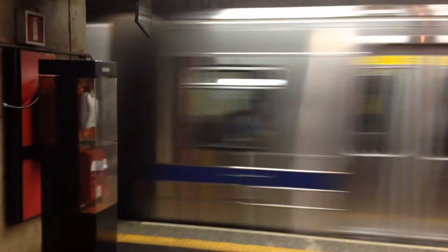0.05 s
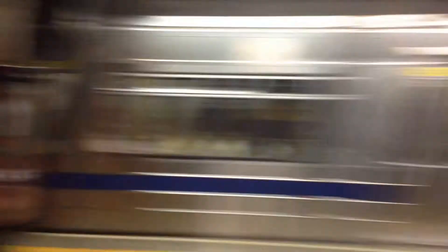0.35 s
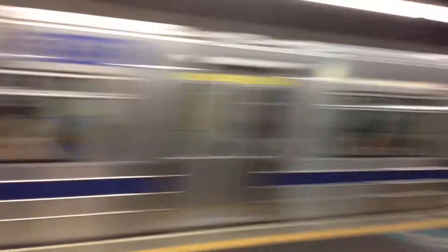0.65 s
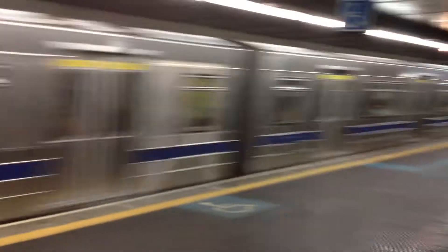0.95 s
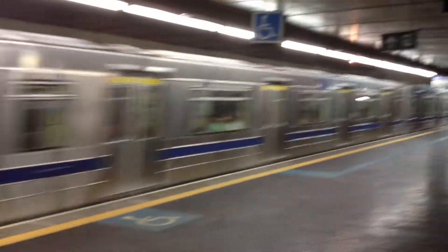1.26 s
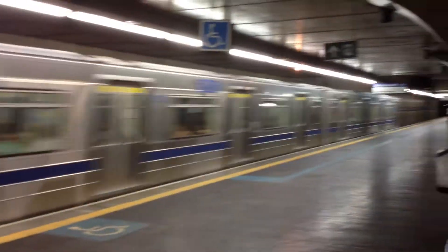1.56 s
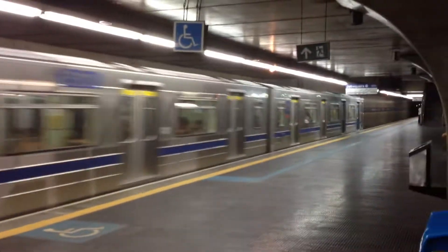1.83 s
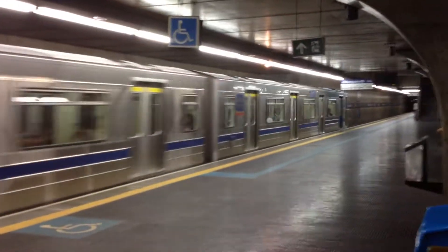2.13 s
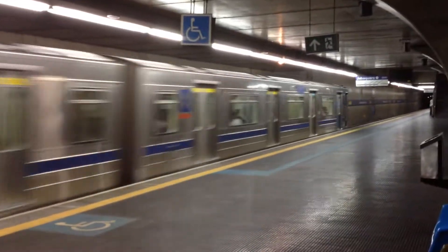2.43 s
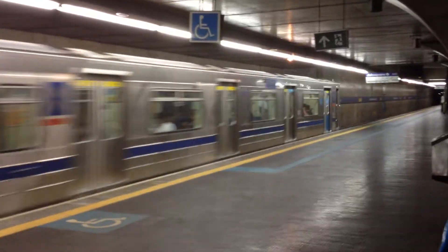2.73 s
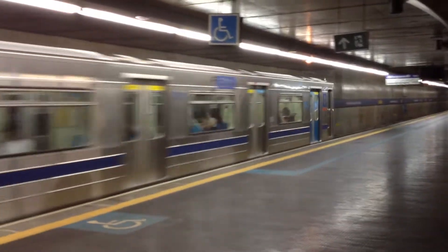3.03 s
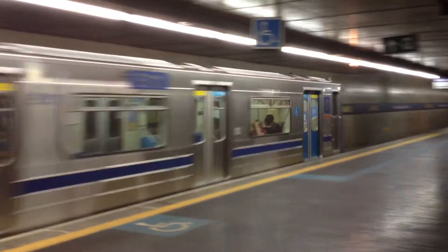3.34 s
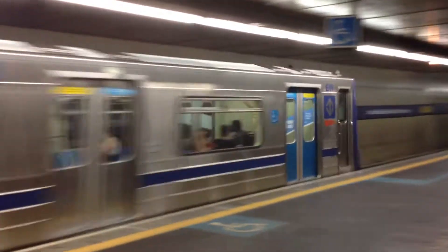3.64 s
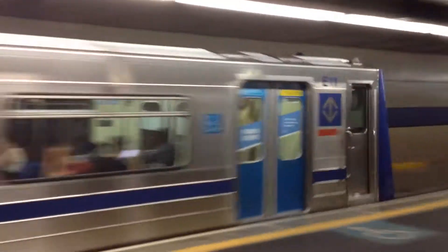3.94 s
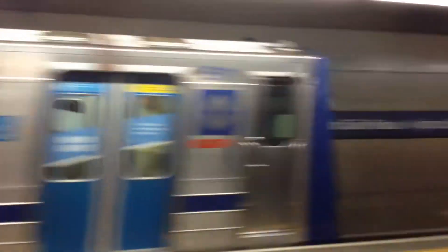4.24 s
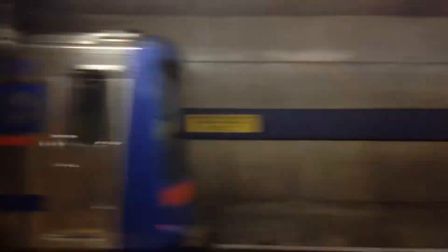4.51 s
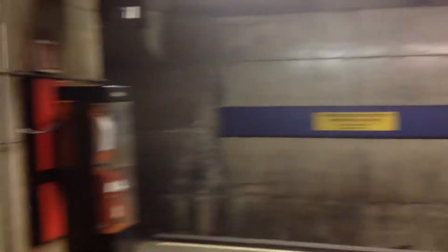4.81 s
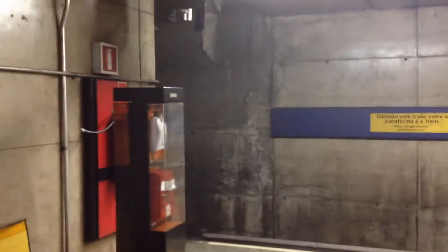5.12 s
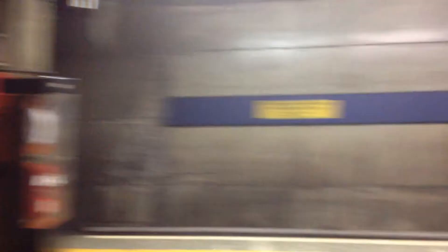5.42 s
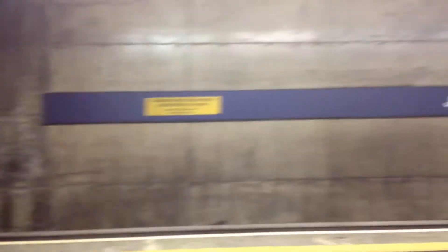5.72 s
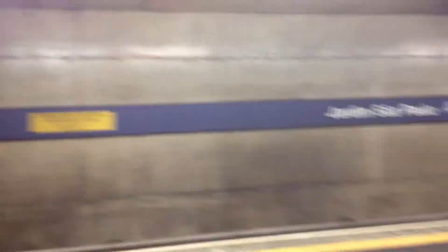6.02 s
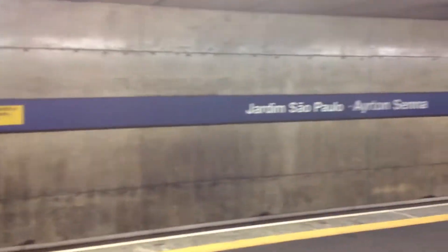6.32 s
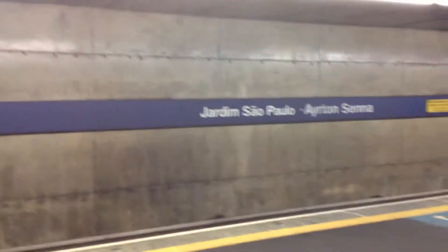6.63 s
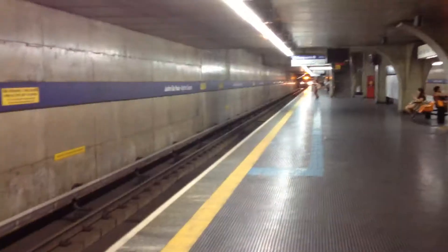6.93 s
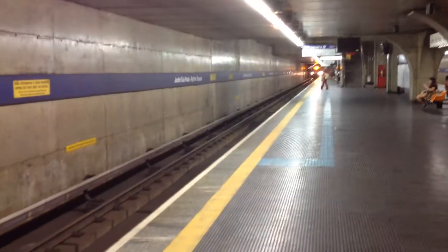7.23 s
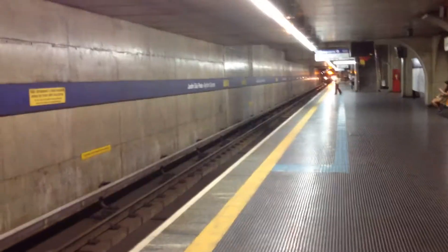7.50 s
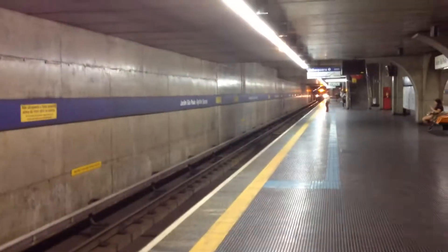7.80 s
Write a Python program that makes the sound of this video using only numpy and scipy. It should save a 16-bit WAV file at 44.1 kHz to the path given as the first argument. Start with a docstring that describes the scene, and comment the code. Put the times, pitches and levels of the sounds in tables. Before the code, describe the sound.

A metro train accelerates past with roaring wheels and whining motors, cuts to silence, then an empty station hums with three faint air puffs.

```python
"""A concrete underground station: a metro train accelerates past the platform. Car bodies rumble,
wheels roar on the rails, gears drone, motors whine and passing bogies bring swells of steel hiss.
Two wheels sing thinly, and an air leak dies away at the start. The train cuts to a short silence;
then the empty station hums, and a train at its far end lets off three puffs of air that ring on
down the hall, the last with a faint tick."""
import sys
import numpy as np
from scipy import signal
from scipy.fft import rfft, irfft, next_fast_len
from scipy.io import wavfile

SR = 44100
rng = np.random.default_rng(int(sys.argv[2]) if len(sys.argv) > 2 else 0)


def transcribe(u):
    """Save the signal u as a 16-bit wav file named by the first command-line argument.

    u: samples, shape (n,) or (channels, n), limited to [-1, 1]; the rate is SR.
    q: integer samples, one column per channel.
    """
    v = np.clip(np.atleast_2d(u).T, -1, 1)
    q = np.round(v * 32767).astype(np.int16)
    wavfile.write(sys.argv[1], SR, q)


N = 351036
TIME = np.arange(N) / SR
BIN_HZ = np.maximum(np.fft.rfftfreq(next_fast_len(N), 1 / SR), 1)
TRAIN_CUT_S, PLATFORM_IN_S = 6.435, 7.046

# Colours of the train's noises. Each row: frequency in Hz, relative level in dB.
RUMBLE_COLOUR = [(25, -38.5), (45, -43), (70, -15.5), (97, -18), (114, -2), (130, -3.5), (160, 0), (185, 0),
                 (230, 0.5), (330, -20.5)]
ROAR_COLOUR = [(140, -35), (190, -16), (235, -1), (290, 3.5), (380, -1), (530, -1.5), (680, -1),
               (950, -2.5), (1100, -4.5), (1350, -10), (1800, -22.5), (3000, -46.5)]
RASP_COLOUR = [(900, -31), (1300, 1.5), (1500, 2.5), (1750, 0.5), (2100, 1.5), (2550, 0), (3000, -5),
               (3900, -10), (4450, -8), (4900, -13.5), (5400, -23.5), (6500, -43.5)]
STEEL_COLOUR = [(2400, -9.5), (3300, 5), (4400, 6), (5050, -3), (5450, -5.5), (6200, 1.5), (7100, -1),
                (8200, 1.5), (9200, -3.5), (10500, -11), (12400, -11.5), (14000, -20), (15700, -26)]
FLANGE_COLOUR = [(8000, -10.5), (10500, -3.5), (11600, 1.5), (12800, -3), (14000, -9.5), (15700, -15.5)]
LEAK_COLOUR = [(4000, -8), (6200, 1.5), (9000, -10), (12500, -12.5), (15700, -8)]
# Wheel and rail resonances. Each row: centre in Hz, width in Hz, boost in dB.
ROAR_MODES = [(438, 96, 3.5), (795, 150, 3), (894, 140, 4.5)]
RASP_MODES = [(2000, 280, 2.7), (3455, 160, 2.5), (4400, 300, 1.1)]
# Fades of the train's layers. Each holds: opening level in dB, sag in dB per second,
# start of the fade into the distance in seconds, loss in dB per doubling of distance.
RUMBLE_FADE = (-26.5, .35, 2, 1.23)
ROAR_FADE = (-15.5, 0.0558, 5.5, 2.26)
RASP_FADE = (-26, 0.3052, 5, 1.5)
HISS_FADE = (-36, 0.8, 4.85, 4)
GEAR_FADE = (-24, 0.95, 6.5, 9)
# Bogies at the car ends go by. Each row: peak time in seconds, half length in seconds,
# lift of the roar in dB, lift of rasp and hiss in dB.
CAR_ENDS = [(0, 0.051, 0.5, 0.7), (.87, .15, 1.8, 1), (2.466, 0.12, 3, 2.9), (3.2, .22, -0.2, 1.0),
            (3.7, 0.14, 2.5, 0.8), (4.75, 0.11, -0.5, 0.8), (5.35, 0.1, 0.5, 0), (5.75, 0.28, 0.8, 1.7)]
# Hums and resonances of passing parts. Each row: peak time in seconds, half length in seconds,
# pitch in Hz, width in Hz, level in dB.
RING_SWELLS = [(1.8, 0.68, 114, 2.5, -37.5), (1.35, .2, 165, 14, -27.5), (2.42, .17, 210, 20, -34.5),
               (2.61, .2, 930, 32, -28), (3.3, 0.23, 222, 4, -32), (3.5, 0.4, 890, 78, -21.5),
               (4.62, 0.083, 310, 30, -26), (6, 0.13, 850, 58, -27), (4.73, 0.98, 1230, 240, -29),
               (1.4, 1, 3900, 800, -37.5), (3.4, 0.32, 4000, 650, -39), (6.05, .35, 560, 170, -25.5)]
# Flanges brush the rail. Each row: peak time in seconds, half length in seconds, level in dB.
FLANGE_SWELLS = [(.05, 0.1, -59.5), (.65, 0.24, -61.5), (2.35, .25, -51.5), (3.6, .15, -59),
                 (4.2, .12, -56), (4.7, 0.13, -53)]
# Gearboxes pass; the closer, the purer the tone.
# Each row: peak time in seconds, half length in seconds, width in Hz, level in dB.
GEARBOXES = [(.58, 0.11, 8.5, -22.5), (.92, 0.14, 7.5, -22.5), (2.0, .16, 30, -22.5), (2.6, 0.088, 20, -23),
             (3.05, .14, 12, -21.5), (3.74, 0.11, 16, -23.5), (5.4, 0.33, 17, -23.5)]
# Motor whine, lost in the roar once its car is past. Each row: time in seconds, pitch in Hz, level in dB.
MOTOR_CURVE = [(0, 1928, -34), (.62, 2026, -31), (1.35, 2063, -33), (1.7, 2070, -50), (2.6, 2062, -67)]
# Two singing wheels, one curve each. Each row: time in seconds, pitch in Hz, level in dB.
WHEEL_CURVES = [
    [(0, 10150, -58), (.9, 10750, -61.5), (1.6, 10650, -74)],
    [(.8, 12100, -71), (2, 12600, -58.5), (2.5, 12480, -62.5), (3.8, 12300, -68.5)],
]
# The air leak dies away. Each row: time in seconds, level of the whistle in dB.
LEAK_CURVE = [(0, -35), (.3, -39.5), (.5, -46.5), (1.2, -57.5), (1.6, -82.5)]

# Colours of the room tone, the puffs and their tail. Each row: frequency in Hz, relative level in dB.
ROOM_COLOUR = [(30, -37), (90, -16), (125, -4.5), (200, 2.5), (300, -2), (480, -0.5), (590, -6.5),
               (700, 0.5), (920, -4.5), (1100, -13), (2400, -24.5), (4500, -35.5), (5400, -47), (8000, -48),
               (10300, -63), (13000, -53), (15700, -57)]
PUFF_COLOUR = [(900, -25), (2300, 10), (3200, -2), (4600, 5), (5400, -7), (6300, 2), (7900, -1),
               (9000, -13), (11000, -25), (15000, -35)]
TAIL_COLOUR = [(700, -13), (1350, 2), (1900, -1), (2300, 1), (3100, -12), (4600, -11), (5400, -25),
               (7700, -23), (9500, -46)]
# Mains hum and other steady tones of the station. Each row: pitch in Hz, relative level in dB.
HUM_TONES = [(120, -57), (240, -46), (413, -44.5), (480, -47), (535, -46.5), (720, -55), (840, -45.5)]
# The fan hum swells twice. Each row: peak time in seconds, half length in seconds, level in dB.
FAN_SWELLS = [(7.31, 0.079, -40), (7.63, .11, -40)]
# Air let off by the far train. Each row: start in seconds, length in seconds, relative level in dB.
PUFFS = [(7.275, 0.083, -51.5), (7.514, 0.087, -52), (7.747, 0.076, -51.5)]


def from_db(db):
    """Decibels to gain."""
    return 10 ** (np.asarray(db) / 20)


def rms_one(x):
    """Scale to rms 1."""
    return x / np.sqrt(np.mean(x ** 2) + 1e-20)


def in_time(rows):
    """Each column of a curve at every sample."""
    s, *columns = np.transpose(rows)
    return [np.interp(TIME, s, column) for column in columns]


def shaped(gain):
    """Noise with the given gain at every frequency; rms 1."""
    size = next_fast_len(N)
    return rms_one(irfft(rfft(rng.standard_normal(size)) * gain, size)[:N])


def drift(rate_hz):
    """A smooth random wander; rms 1."""
    return shaped(1 / (1 + (BIN_HZ / rate_hz) ** 2 / 2) ** 2)


def flutter(rate_hz, depth_db):
    """A gain that wavers around 1."""
    return from_db(depth_db * drift(rate_hz))


def noise(colour, modes=()):
    """Noise with a broad colour, steep roll-offs at both ends and resonant humps on top; rms 1."""
    hz, db = np.transpose(colour)
    octaves_above = np.maximum(np.log2(BIN_HZ / hz[-1]), 0)
    octaves_below = np.maximum(np.log2(hz[0] / BIN_HZ), 0)
    eq_db = np.interp(np.log(BIN_HZ), np.log(hz), db) - 60 * octaves_above - 24 * octaves_below
    for centre, width, boost in modes:
        eq_db += boost / (1 + (2 * (BIN_HZ - centre) / width) ** 2)
    return shaped(from_db(eq_db))


def smeared_tone(hz, width_hz):
    """A tone heard over many paths at once, so that its level and phase wander; rms 1."""
    phase = 2 * np.pi * np.cumsum(hz * np.ones(N)) / SR
    return rms_one(drift(width_hz) * np.cos(phase) + drift(width_hz) * np.sin(phase))


def passing(s, half_s):
    """The bell-shaped gain of a pass-by."""
    return np.exp(-.5 * ((TIME - s) / half_s) ** 2)


def swelling(rows):
    """The gain of a run of swells."""
    return sum(from_db(db) * passing(s, half_s) for s, half_s, db in rows)


def receding(fade, first_doubling_s=0.45):
    """Level in dB that sags as the cars go by, then falls with distance behind the train."""
    db, sag_db_per_s, gone_s, doubling_db = fade
    distance = 1 + np.maximum(TIME - gone_s, 0) / first_doubling_s
    return db - sag_db_per_s * TIME - doubling_db * np.log2(distance)


def rolling():
    """Rough steel rolls on steel, surging at car ends; the changing wheel load shakes all but the hiss."""
    roar_lift = sum(db * passing(s, half_s) for s, half_s, db, _ in CAR_ENDS)
    contact_lift = sum(db * passing(s, half_s) for s, half_s, _, db in CAR_ENDS)
    load = flutter(rate_hz=20, depth_db=.5)
    rumble = from_db(receding(RUMBLE_FADE)) * noise(RUMBLE_COLOUR) * flutter(rate_hz=9, depth_db=1.44)
    roar = from_db(receding(ROAR_FADE) + roar_lift) * noise(ROAR_COLOUR, ROAR_MODES)
    rasp = from_db(receding(RASP_FADE) + contact_lift) * noise(RASP_COLOUR, RASP_MODES)
    hiss = from_db(receding(HISS_FADE) + contact_lift) * noise(STEEL_COLOUR)
    return load * (rumble + roar + rasp) + hiss


def bogies():
    """Bogies add their own ringing and a sizzle of flange on rail while they are close."""
    ringing = sum(from_db(db) * passing(s, half_s) * smeared_tone(hz, width_hz)
                  for s, half_s, hz, width_hz, db in RING_SWELLS)
    return ringing + swelling(FLANGE_SWELLS) * noise(FLANGE_COLOUR)


def drives():
    """Gears and motors climb with speed and level off, smeared by each axle's own Doppler shift."""
    start_hz, top_hz, rise_s = 298.8, 348, 1.6
    gear_hz = top_hz - (top_hz - start_hz) * np.exp(-TIME / rise_s)
    drone = from_db(receding(GEAR_FADE)) * smeared_tone(gear_hz, width_hz=20)
    close_gears = sum(from_db(db) * passing(s, half_s) * smeared_tone(gear_hz, width_hz)
                      for s, half_s, width_hz, db in GEARBOXES)
    motor_hz, motor_db = in_time(MOTOR_CURVE)
    whine = from_db(motor_db) * smeared_tone(motor_hz, width_hz=65)
    return drone + close_gears + whine


def wheel_song(fade_db_per_s=30):
    """Each wheel sings high and thin while it is near and fades on either side."""
    song = np.zeros(N)
    for curve in WHEEL_CURVES:
        hz, db = in_time(curve)
        away_s = np.abs(TIME - np.clip(TIME, curve[0][0], curve[-1][0]))
        song += from_db(db - fade_db_per_s * away_s) * smeared_tone(hz, width_hz=280)
    return song


def air_leak():
    """Compressed air whistles hoarsely through a valve, with a thin hiss on top."""
    db, = in_time(LEAK_CURVE)
    whistle = smeared_tone(hz=5100, width_hz=280)
    hiss = from_db(-15) * noise(LEAK_COLOUR)
    return from_db(db) * (whistle + hiss)


def hum_tone(hz):
    """A sine of rms near 1 whose level and phase waver slightly."""
    phase = 2 * np.pi * hz * TIME + .35 * drift(rate_hz=3)
    return np.sqrt(2) * np.sin(phase) * flutter(rate_hz=4.3, depth_db=2.2)


def room_tone():
    """Ventilation and distant rolling lay a bed under the hum of mains and fans."""
    bed = from_db(-32.5) * noise(ROOM_COLOUR)
    hum = sum(from_db(db - 1.5) * hum_tone(hz) for hz, db in HUM_TONES)
    fan = (from_db(-48) + swelling(FAN_SWELLS)) * hum_tone(hz=184.4)
    return bed + hum + fan


def reverb_envelope(power, t60_s):
    """The gain of a sound whose energy builds up in a space and dies away."""
    feedback = 10 ** (-6 / (t60_s * SR))
    return np.sqrt(signal.lfilter([1 - feedback], [1, -feedback], power + 1e-18))


def air_puffs(attack_s=0.014, release_s=.03):
    """Each puff arrives bright, then rings on down the long hall with a darker tail."""
    jet_power = np.zeros(N)
    for s, length_s, db in PUFFS:
        opening = np.clip((TIME - s) / attack_s, 0, 1)
        closing = np.clip((s + length_s - TIME) / release_s, 0, 1)
        jet_power += from_db(db) ** 2 * opening * closing
    bursts = reverb_envelope(jet_power, t60_s=0.27) * noise(PUFF_COLOUR)
    tail = from_db(16) * reverb_envelope(jet_power, t60_s=4.7) * noise(TAIL_COLOUR)
    return bursts + tail


def tick(start_s=7.818, decay_s=.003):
    """A small dry click in the last puff, gone in a few milliseconds."""
    envelope = (TIME > start_s) * np.exp(-np.abs(TIME - start_s) / decay_s)
    return from_db(-51) * envelope * noise(STEEL_COLOUR)


def scene():
    """The pass-by, a hard cut to silence, then the empty platform; mono."""
    train = rolling() + bogies() + drives() + wheel_song() + air_leak()
    platform = room_tone() + air_puffs() + tick()
    return (train * (TIME < TRAIN_CUT_S) + platform * (TIME > PLATFORM_IN_S))[None]


def record(dry):
    """Soft saturation rounds the peaks; filters trim the sub-bass and the very top."""
    ceiling, low_cut_hz, high_cut_hz = 1.1, 55, 15750
    rounded = ceiling * np.tanh(dry / ceiling)
    low_cut = signal.butter(2, low_cut_hz, "high", fs=SR, output="sos")
    high_cut = signal.ellip(12, .1, 80, high_cut_hz, fs=SR, output="sos")
    return signal.sosfilt(high_cut, signal.sosfilt(low_cut, rounded))


dry = scene()
out = record(dry)
transcribe(out)
```